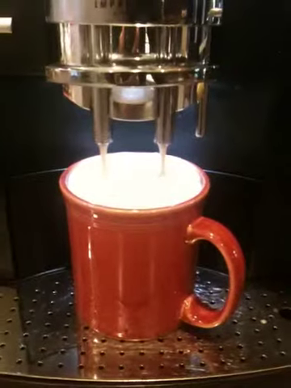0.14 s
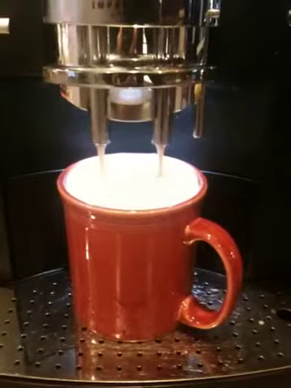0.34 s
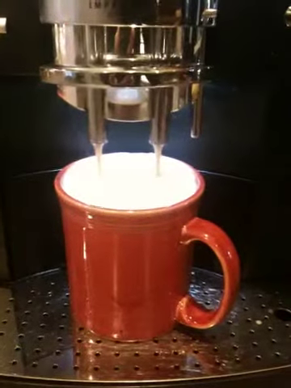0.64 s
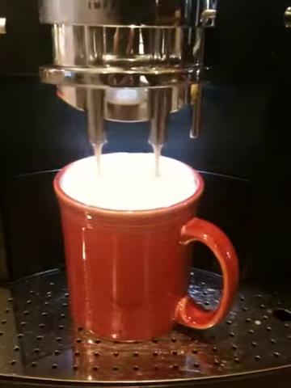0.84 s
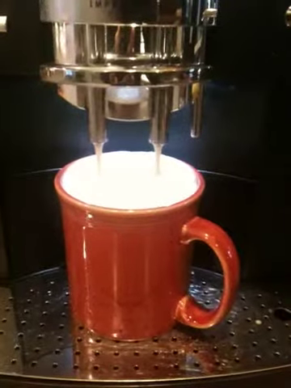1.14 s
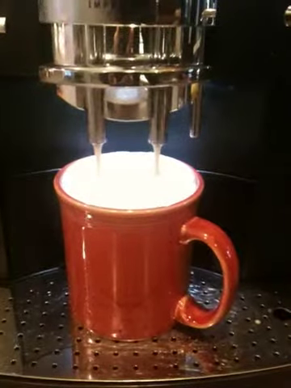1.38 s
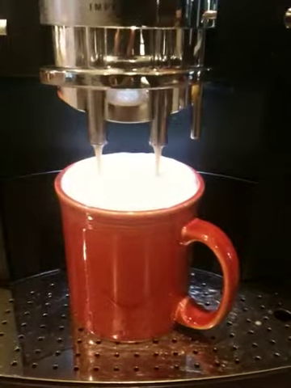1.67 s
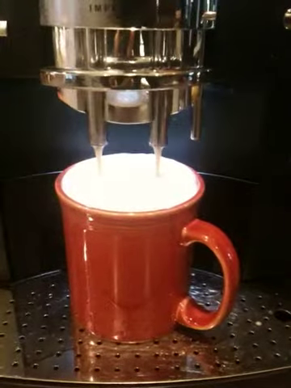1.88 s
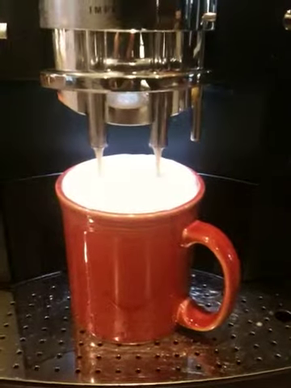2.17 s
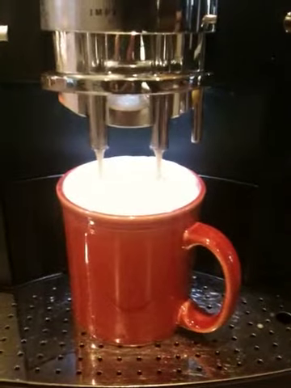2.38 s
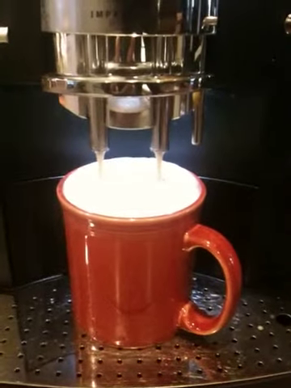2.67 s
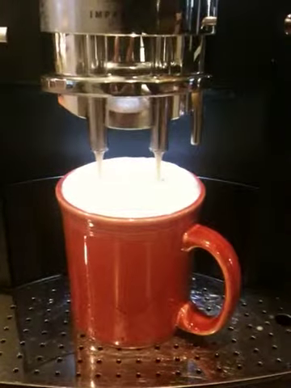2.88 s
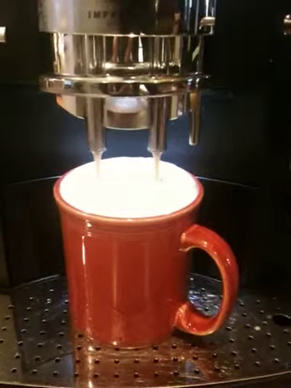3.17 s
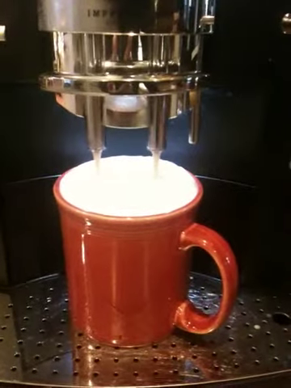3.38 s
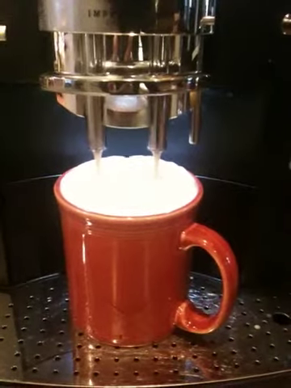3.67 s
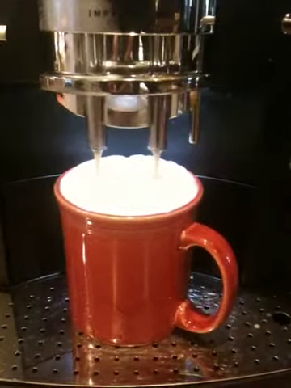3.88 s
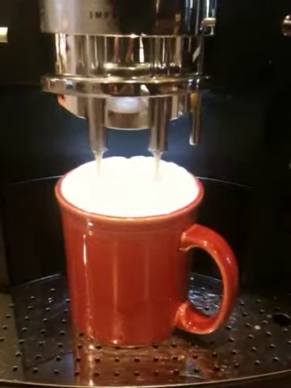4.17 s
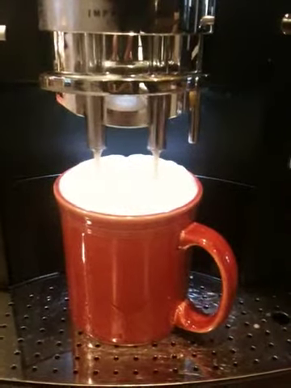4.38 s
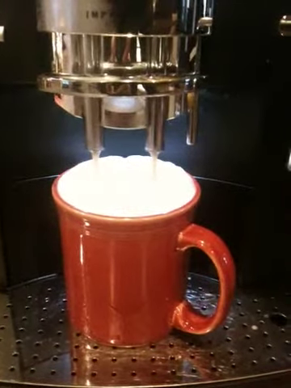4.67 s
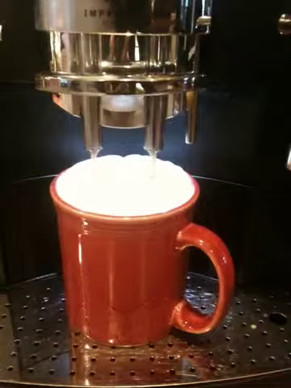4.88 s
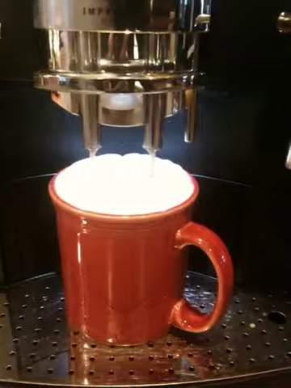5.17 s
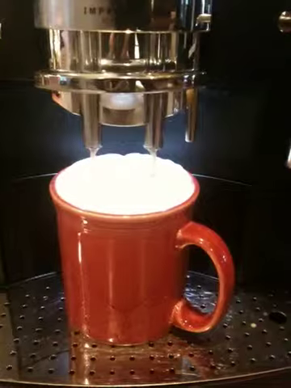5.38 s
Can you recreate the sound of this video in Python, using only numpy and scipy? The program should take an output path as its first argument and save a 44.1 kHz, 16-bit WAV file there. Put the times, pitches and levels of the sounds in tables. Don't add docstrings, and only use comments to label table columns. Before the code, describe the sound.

A coffee machine's pump buzzes steadily with hissing water, stops abruptly near four seconds, then a loud mechanical clack and a smaller shifting clunk follow.

```python
import sys
import numpy as np
from scipy import signal
from scipy.fft import rfft, irfft, next_fast_len
from scipy.io import wavfile
from scipy.ndimage import uniform_filter1d, minimum_filter1d

SR = 44100
rng = np.random.default_rng(int(sys.argv[2]) if len(sys.argv) > 2 else 0)


def log_audio(samples):
    frames = np.atleast_2d(samples).T
    limited = np.clip(frames, -1, 1)
    pcm = np.round(limited * 32767).astype(np.int16)
    wavfile.write(sys.argv[1], SR, pcm)


def voltage_ratio(level):
    return 10 ** (np.asarray(level, float) / 20)


N = 244298
TIME = np.arange(N) / SR
MAINS_HZ, STROKE_S, STOP_S = 60.004, .0078, 3.945

# f/Hz, density/dB per Hz
SPRAY = [(25, -22), (80, -15), (150, -3), (215, -5), (400, -5.5), (560, -3), (1000, -7.5), (1250, -8.5),
         (1550, -8.5), (1800, -8.5), (2050, -7), (2430, -12.5), (2950, -5), (4400, -23.5)]
# f/Hz, density/dB per Hz
HISS = [(2500, -22), (3800, -5.5), (5000, -7), (7500, -5), (9200, -11.5), (10500, -12), (14500, -26),
        (15800, -14)]


def level(x, db):
    return x * voltage_ratio(db) / np.sqrt(np.mean(x ** 2))


def shaped(table):
    hz, db = np.transpose(table)
    size = next_fast_len(N)
    log_hz = np.log(np.arange(size // 2 + 1) * SR / size + 1)
    gain = voltage_ratio(np.interp(log_hz, np.log(hz), db, -90, -90))
    noise = rng.standard_normal(size)
    return level(irfft(rfft(noise) * gain, size)[:N], 0)


def ring(x, hz, t60):
    r = np.exp(-np.log(1000) / (max(t60, .002) * SR))
    w = 2 * np.pi * hz / SR
    return signal.lfilter([0, r * np.sin(w)], [1, -2 * r * np.cos(w), r * r], x)


def narrow(hz, width_hz):
    return ring(rng.standard_normal(N), hz, np.log(1000) / np.pi / width_hz)


def walk(rate):
    hold = int(SR / rate)
    steps = np.repeat(rng.standard_normal(N // hold + 1), hold)
    return 0.85 * uniform_filter1d(uniform_filter1d(steps, hold), hold)[:N]


def burst(s, rise, fall):
    age = TIME - s
    return np.exp(np.where(age < 0, age / max(rise, 1e-4), -age / max(fall, 1e-4)))


def room(x):
    # low edge f/Hz, high edge f/Hz, t60/s, level/dB
    bands = [(88.5, 370, 0.39, -11), (400, 2800, 0.58, -16), (1440, 2600, 0.47, -7.5),
             (3940, 5900, 0.39, -11.5), (7000, 22000, 0.17, -28)]
    age, echo = TIME[:SR // 2], 0
    for low_hz, high_hz, t60, db in bands:
        sos = signal.butter(2, [low_hz, high_hz], "band", fs=SR, output="sos")
        band = signal.sosfilt(sos, rng.standard_normal(len(age)))
        tail = band * (1 - np.exp(-age / 0.0051)) * voltage_ratio(-60 * age / t60)
        echo = echo + voltage_ratio(db) * tail * np.sqrt(SR / 2 / t60) / SR * voltage_ratio(15.5)
    return signal.fftconvolve(x, echo)[:N]


def kitchen():
    # f/Hz, level/dB rms
    whine_lines = [(14912, -101), (14971, -90), (15030, -90), (15089, -97), (15149, -102), (15208, -103)]
    # f/Hz, density/dB per Hz
    floor_colour = [(70, -27), (170, -9), (200, -3.5), (240, -10.5), (430, -18.5), (620, -13), (1050, -18),
                    (1700, -18.5), (2050, -23.5), (3200, -23), (4700, -27.5), (8000, -29.5), (14500, -30.5),
                    (15800, -34)]
    whine = level(narrow(15030, 220), -92)
    for hz, db in whine_lines:
        whine = whine + np.sqrt(2) * voltage_ratio(db) * np.sin(2 * np.pi * (hz * TIME + rng.random()))
    fan = level(voltage_ratio(2.5 * walk(18)) * narrow(204, 12), -75.5)
    floor = level(voltage_ratio(.5 * walk(7.7)) * shaped(floor_colour), -68.5)
    return floor + fan + whine


def drain():
    since_stop = TIME - STOP_S
    start = np.clip(since_stop / .04, 0, 1)
    fade = np.exp(-np.clip(since_stop, 0, 2) / 0.48)
    return start * fade * level(shaped(HISS) + shaped(SPRAY), -70.5)


def housing_hum(pressure):
    # multiple of mains, level at low pressure/dB, gain as pressure builds/dB
    partials = [(1, -43.5, -5), (1.997, -8, -2.5), (3, -2.5, -2), (4, 1.3, -1), (5.01, -2.5, -0.9),
                (6.003, -8.5, -0.5), (7, -12, -1), (7.98, -9.5, -1.5), (9.02, -3.5, 2), (10.004, -6, -2.5),
                (11, -22, 12), (12, -16.5, 3.5), (13.07, -10, -5.5), (14, -26, -11), (15, -18.5, 5),
                (16, -22, 3.5), (17, -25, 2), (18.06, -11.5, -4), (19, -18, 3.5), (20, -35, 22),
                (21, -22, -15), (22, -23.5, 9.5), (23, -25, 11), (24, -21, 1), (25, -27.5, 8),
                (26, -16, -1.5), (26.91, -19.5, 1.5), (27.9, -27, 0)]
    wobble_db, wobble_turns = .05, .0016
    panel_lag, panel_spread, panel_bend, panel_turn = .577, .198, .039, -.09
    cycles = MAINS_HZ * (TIME - STROKE_S)
    hum = 0
    for multiple, early_db, gain_db in partials:
        k = round(multiple)
        db = early_db + pressure * gain_db + wobble_db * k * walk(11.0)
        turns = k * (cycles + panel_lag) + panel_spread * k ** 2 + panel_bend * k ** 3 + panel_turn
        hum = hum + voltage_ratio(db) * np.cos(2 * np.pi * (turns + wobble_turns * k * walk(25.2)))
    return hum


def piston_knock():
    # f/Hz, level/dB, t60/s
    metal_modes = [(1876, -9.5, 0.042), (2023, -0.5, 0.028), (2157, -10, 0.046), (2350, -9, 0.03),
                   (2580, -16, 0.071), (2842, -7, 0.035), (3030, -2.5, 0.032), (3200, -7, 0.023),
                   (3340, -10.5, .03), (3500, -8.5, 0.022), (3805, -15, 0.033), (4050, -17, 0.036),
                   (4500, -18.5, 0.057)]
    strokes = np.arange(int(STOP_S * MAINS_HZ) + 1) / MAINS_HZ + STROKE_S
    blows = np.zeros(N)
    for lag, creep, db in (-.0016, 0, 7.5), (.0011, .00004, 5), (.0044, -.0001, 3):
        late, strength = rng.standard_normal((2, len(strokes)))
        at = (strokes * (1 + creep) + lag + .00002 * late) * SR
        force = voltage_ratio(db + .6 * strength)
        first, part = at.astype(int), at % 1
        np.add.at(blows, first, force * (1 - part))
        np.add.at(blows, first + 1, force * part)
    knock = 0
    for k, (hz, db, t60) in enumerate(metal_modes):
        knock = knock + (-1) ** k * voltage_ratio(db) * ring(blows, hz, t60)
    return knock


def water_jets():
    # f/Hz, width/Hz, level/dB
    nozzle_whistles = [(5200, 180, -10.5), (5730, 230, -8), (6700, 370, -6.5), (8560, 260, -9.5),
                       (9750, 300, -12.5)]
    age = (MAINS_HZ * (TIME - STROKE_S) + 0.14) % 1 / 0.16
    jet = (age * np.exp(1 - age)) ** 1.5
    whistles = sum(level(narrow(hz, width_hz), db + 0.5) for hz, width_hz, db in nozzle_whistles)
    spray = (2.9 + jet) * voltage_ratio(1.1 * walk(6.17)) * shaped(SPRAY)
    hiss = (0.74 + jet) * voltage_ratio(0.97 * walk(16)) * (shaped(HISS) + whistles)
    return level(spray, 1.0) + level(hiss, -7.5)


def pump():
    pressure = np.clip((TIME - 1) / 3.5, -.2, 1.2)
    running = np.exp(-np.clip(TIME - STOP_S, 0, 1) / 0.015)
    hum = level(housing_hum(pressure), 0) * voltage_ratio(-50.5 + 0.8 * pressure)
    strokes = (level(piston_knock(), -3.5) + water_jets()) * voltage_ratio(-64 + 1.45 * pressure)
    return running * (hum + strokes * running)


def shudder():
    # t/s, chatter level/dB, thump level/dB, fall/s
    shakes = [
        (3.985, -56, -57, 0.045),
        (4.006, -69, -68, 0.061),
        (4.101, -78, -63, 0.037),
        (4.216, -64, -70, .02),
        (5.211, -71, -61, 0.044),
        (5.444, -46.5, -42, 0.033),
        (5.478, -52, -59, 0.024),
        (5.507, -54, -47, 0.039),
    ]
    # f/Hz, density/dB per Hz
    chatter_colour = [(240, -28), (400, 3.5), (649, -6.5), (748, -3), (939, -11.5), (1180, -3), (1360, -15),
                      (2340, -16), (12000, -40.5), (15600, -79), (22000, -120)]
    # f/Hz, density/dB per Hz
    thump_colour = [(55, -32), (110, -7), (170, -5), (240, -1), (340, 0), (450, -26)]
    chatter, thump = 0, 0
    for s, chatter_db, thump_db, fall in shakes:
        shape = burst(s, 0.0069, fall)
        chatter = chatter + voltage_ratio(chatter_db) * shape
        thump = thump + voltage_ratio(thump_db) * shape
    chatter = chatter * voltage_ratio(4.2 * walk(120) - 2.5) * shaped(chatter_colour)
    return chatter + thump * voltage_ratio(2.7 * walk(50) - 1.5) * shaped(thump_colour)


def latch():
    # t/s, peak level/dB, fall/s, crack level/dB
    dull_knocks = [(3.984, -62, .012, -26), (4.008, -47, 0.0064, -6), (4.039, -58, .005, -20),
                   (4.2065, -45.5, 0.0078, -13), (4.9437, -15, 0.0042, -19), (4.950, -18.5, 0.0088, -29),
                   (5.209, -42.5, 0.0055, -14), (5.4415, -30, 0.0043, -3), (5.449, -28.5, 0.002, -22),
                   (5.468, -32, 0.0089, -31), (5.498, -33, .0065, -33), (5.505, -43, .007, -36),
                   (5.523, -38, .008, -33)]
    # t/s, peak level/dB, fall/s, crack level/dB
    catch_snaps = [
        (4.9335, -27.5, 0.0049, -23),
        (4.9372, -16.5, 0.0045, -4),
        (4.9415, -22, .0038, -4.5),
        (4.967, -31, 0.03, -13.5),
        (5.430, -41, 0.0041, -1.5),
        (5.437, -29.5, 0.0032, -11),
    ]
    # f/Hz, level/dB, t60/s
    body_modes = [(163, -9, 0.033), (236, -23, 0.074), (319, -11, 0.076), (350, -6, 0.15),
                  (425, -14, 0.085), (542, -1.3, 0.065), (584, 3.5, 0.063), (671, 0.5, 0.065),
                  (735, 2.5, 0.028), (818, -2, 0.028), (990, -10, 0.033), (1080, -15, 0.028),
                  (1330, -32, 0.028)]
    # f/Hz, density/dB per Hz
    crack_colour = [(800, -40), (1200, 2.5), (2000, -1), (3000, 1.5), (3600, -2), (4300, -18.5),
                    (5200, -42)]
    # f/Hz, density/dB per Hz
    edge_colour = [(2470, -47), (4200, -6.5), (5570, 1.5), (6540, -4.5), (6880, -1), (8080, -3),
                   (9440, 0.5), (10500, -7), (15800, -12)]
    push, crack, edge = np.zeros((3, N))
    # blows, rise in s, edge relative to crack in dB
    for hits, rise, edge_db in (dull_knocks, 0.0011, -16), (catch_snaps, 0.00089, 0.5):
        for s, db, fall, crack_db in hits:
            shape = voltage_ratio(db) * burst(s, rise, fall)
            push = push + shape
            crack = crack + voltage_ratio(crack_db) * shape
            edge = edge + voltage_ratio(crack_db + edge_db) * shape
    contact = push * (rng.standard_normal(N) - .6)
    body = sum(voltage_ratio(db) * ring(contact, hz, t60) for hz, db, t60 in body_modes)
    bright = crack * shaped(crack_colour) + edge * shaped(edge_colour)
    return voltage_ratio(-38.0) * body + voltage_ratio(-6.0 + 1.5 * walk(700)) * bright


def scene():
    blows, shakes = latch(), shudder()
    no_bass = signal.butter(4, 155, "high", fs=SR, output="sos")
    less_bass = signal.butter(2, 90, "high", fs=SR, output="sos")
    clacks = signal.sosfilt(no_bass, blows + room(blows + shakes))
    surroundings = signal.sosfilt(less_bass, shakes + kitchen())
    return (pump() + drain() + clacks + surroundings)[None]


def roll_off(x):
    return signal.sosfilt(signal.butter(12, 16370, fs=SR, output="sos"), x)


def record(dry):
    cut = signal.ellip(8, .2, 50, 15740, fs=SR, output="sos")
    ahead_s, mask_db = .009, -35
    reach = int(ahead_s * SR)
    power = uniform_filter1d(dry ** 2, size=66) + 1e-18
    ahead = -np.roll(minimum_filter1d(-power, size=reach), -reach // 2, axis=1)
    kept = power / (power + ahead * voltage_ratio(2 * mask_db))
    return roll_off(signal.sosfilt(cut, dry * kept))


dry = scene()
out = record(dry)
log_audio(out)
```